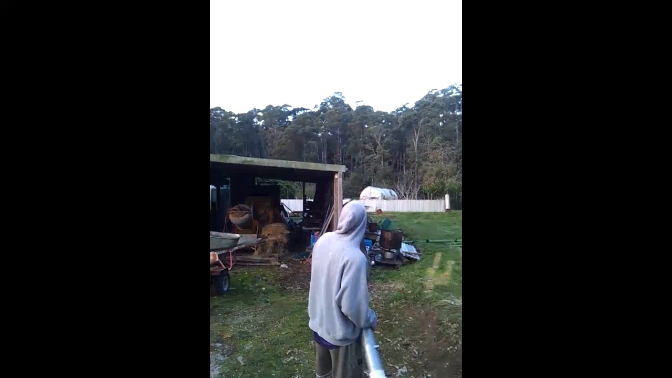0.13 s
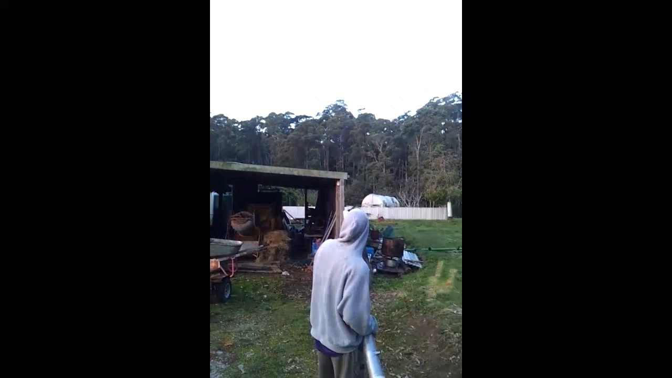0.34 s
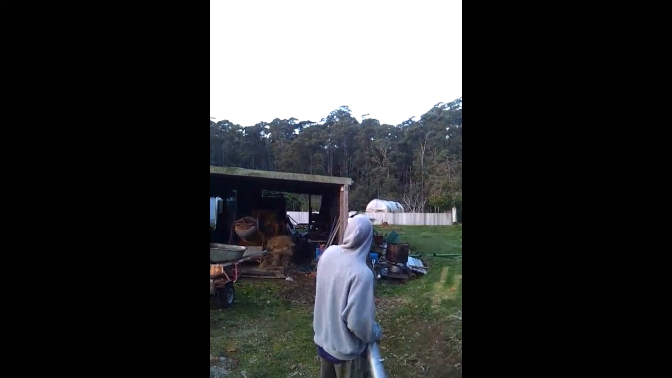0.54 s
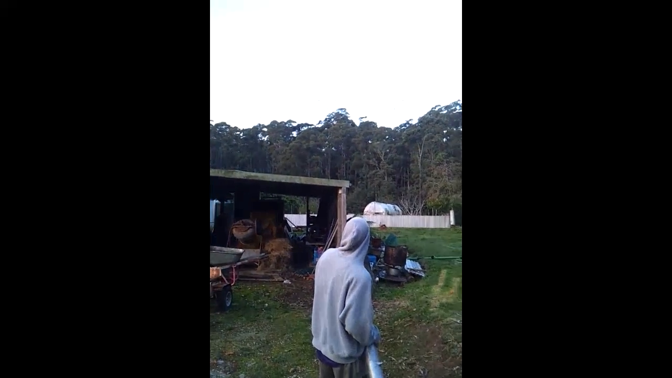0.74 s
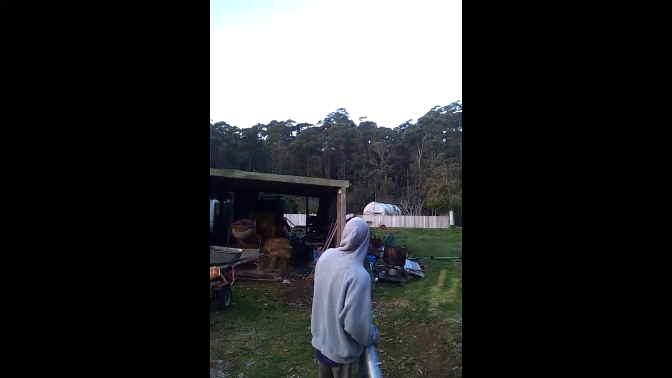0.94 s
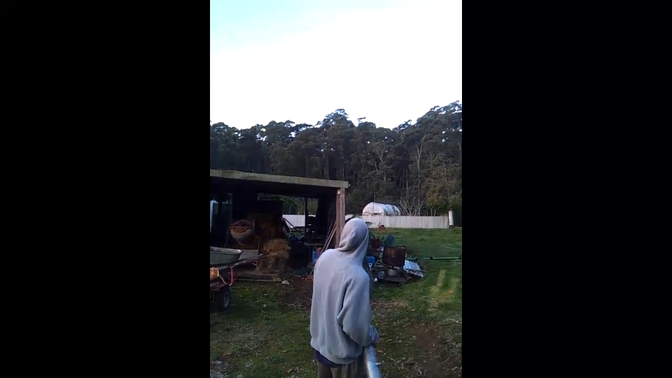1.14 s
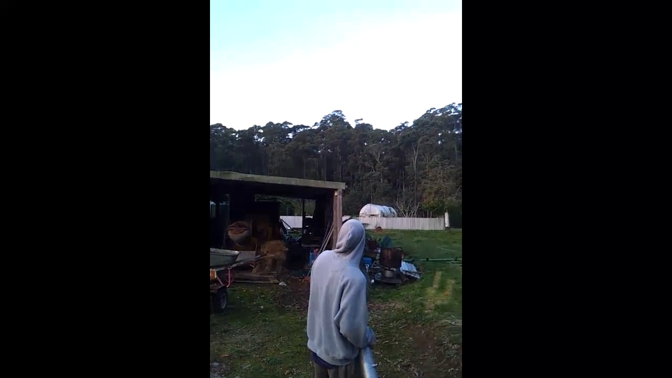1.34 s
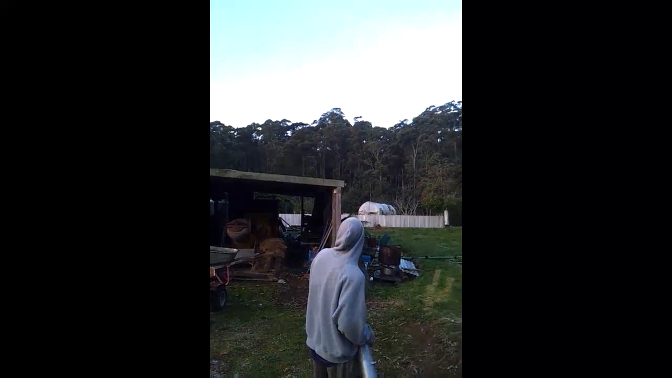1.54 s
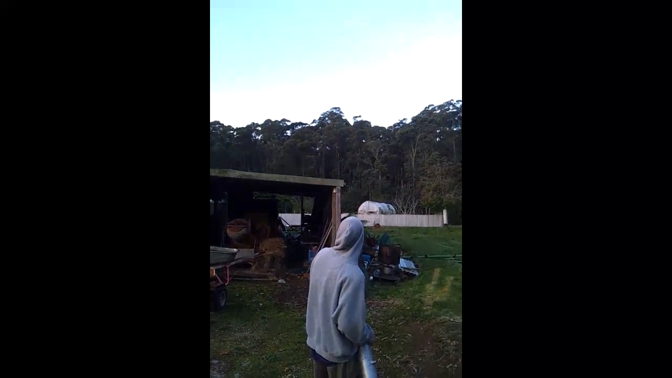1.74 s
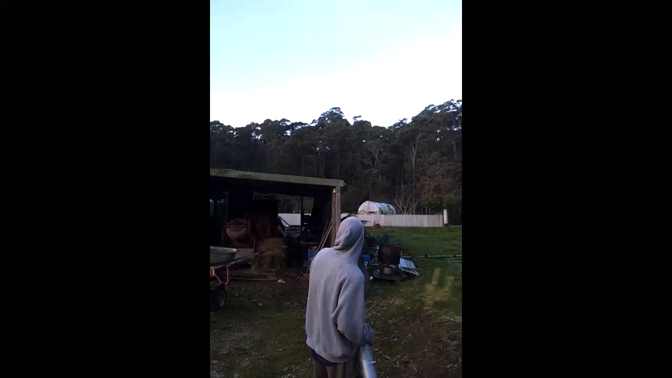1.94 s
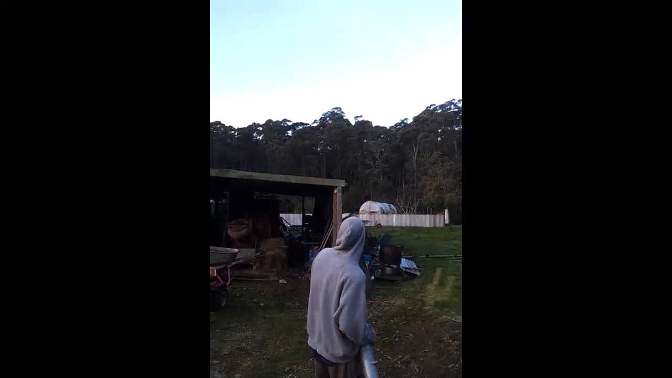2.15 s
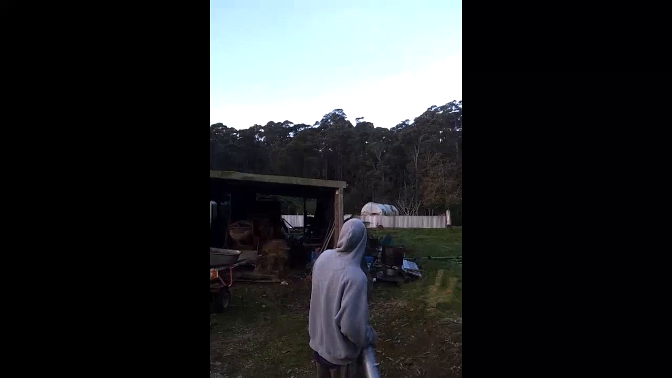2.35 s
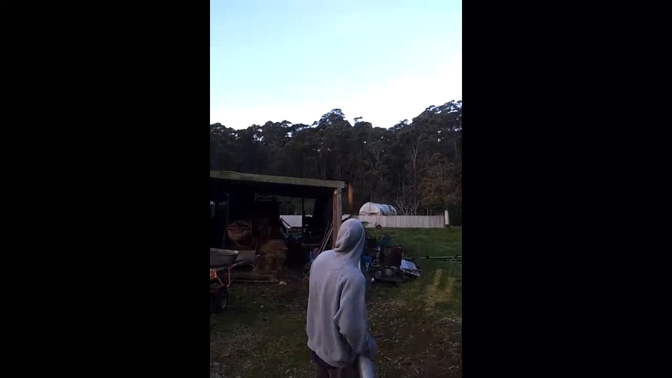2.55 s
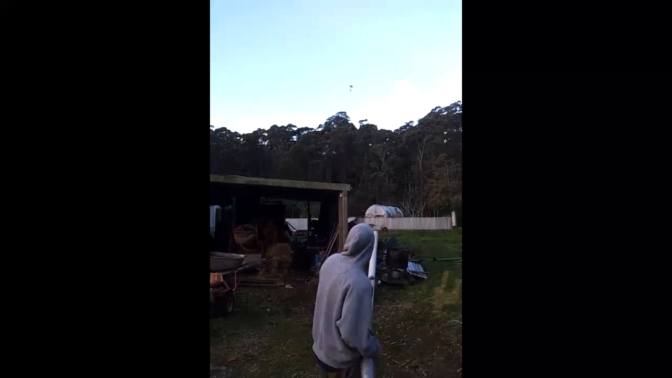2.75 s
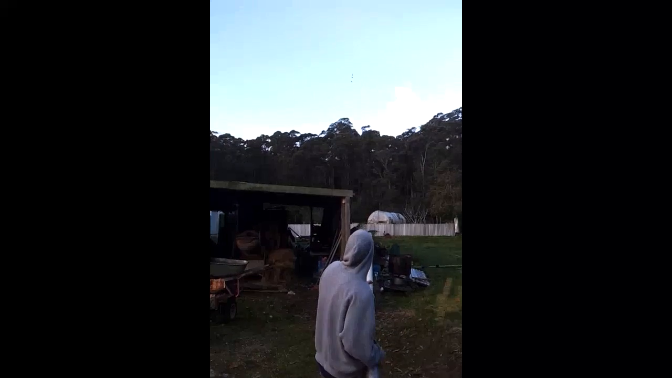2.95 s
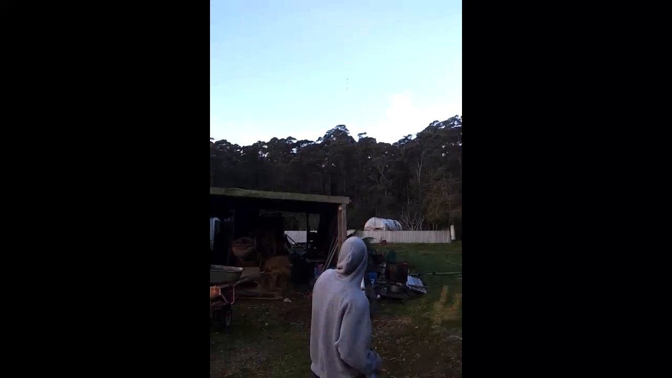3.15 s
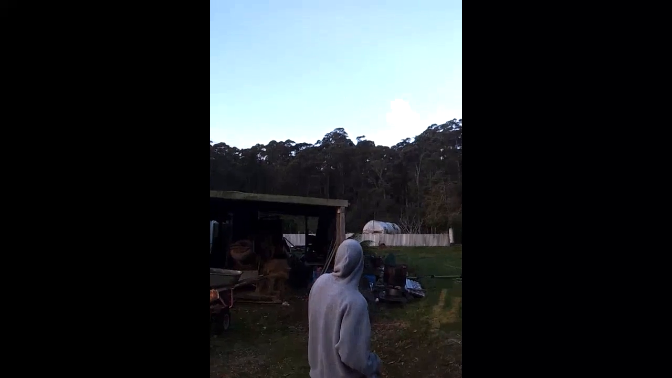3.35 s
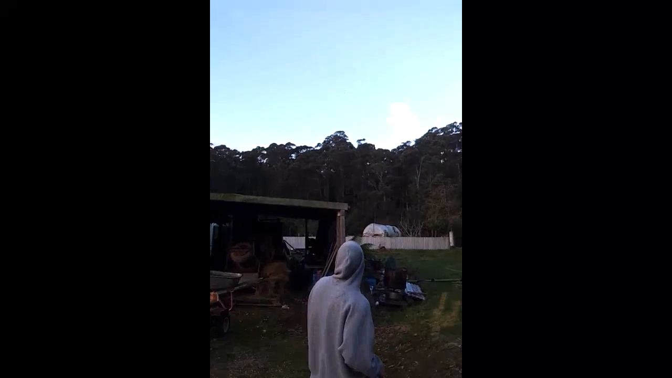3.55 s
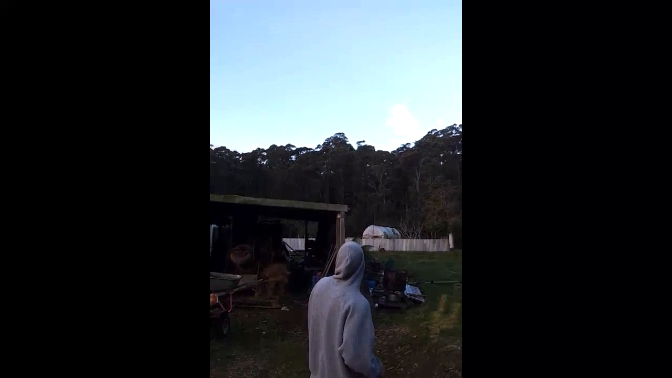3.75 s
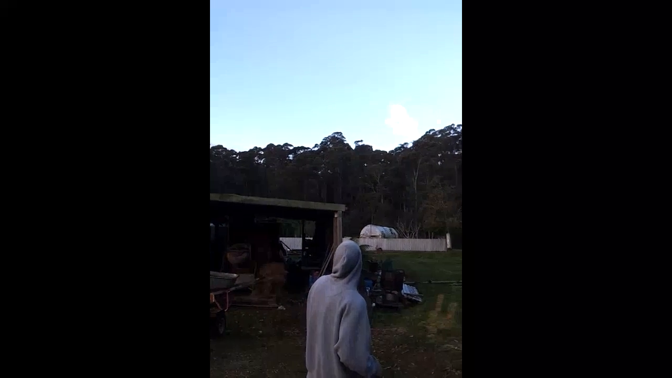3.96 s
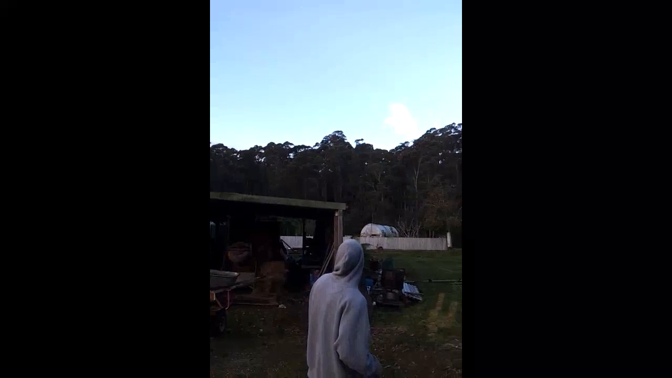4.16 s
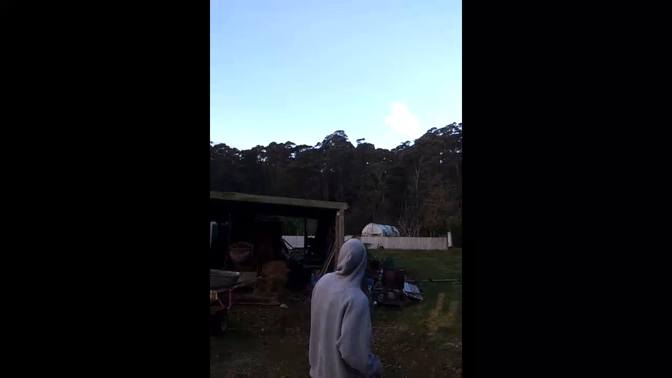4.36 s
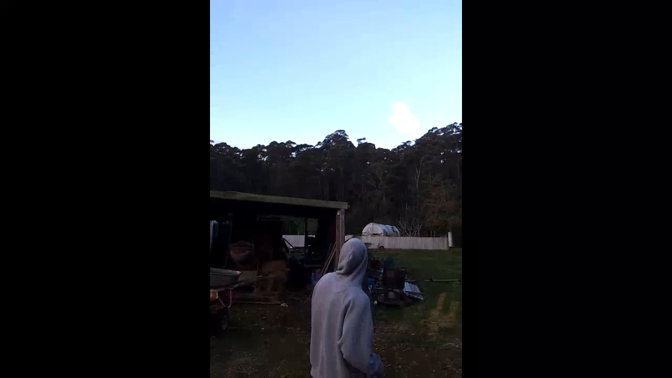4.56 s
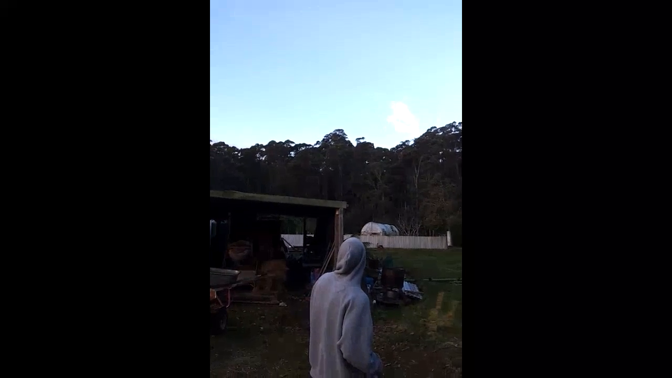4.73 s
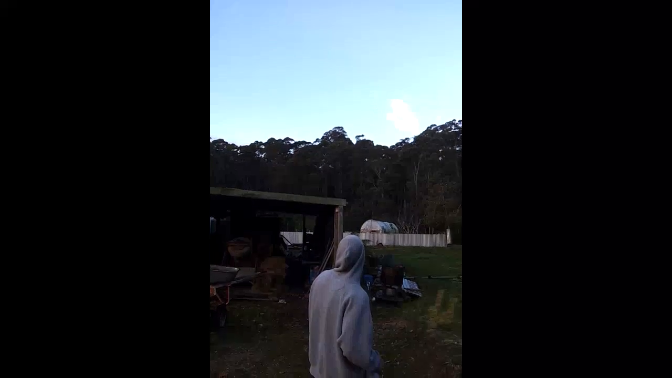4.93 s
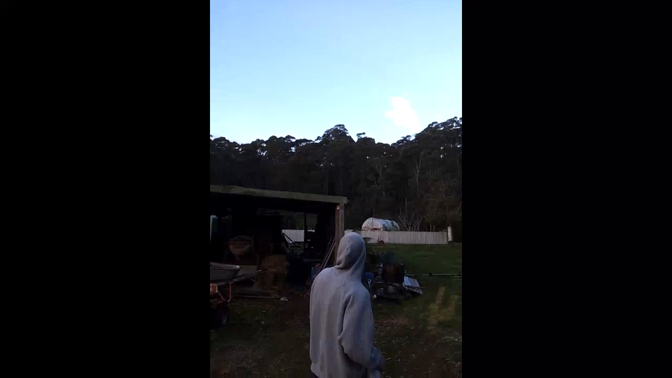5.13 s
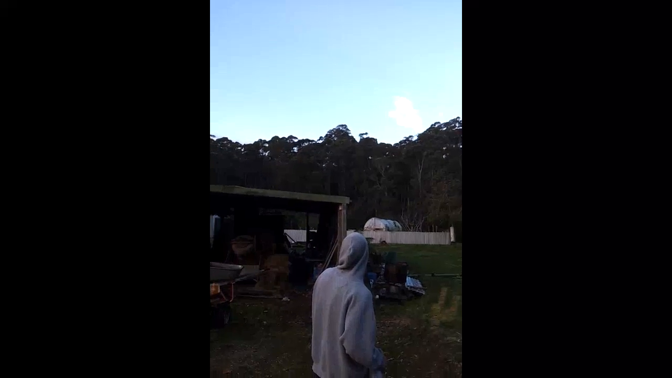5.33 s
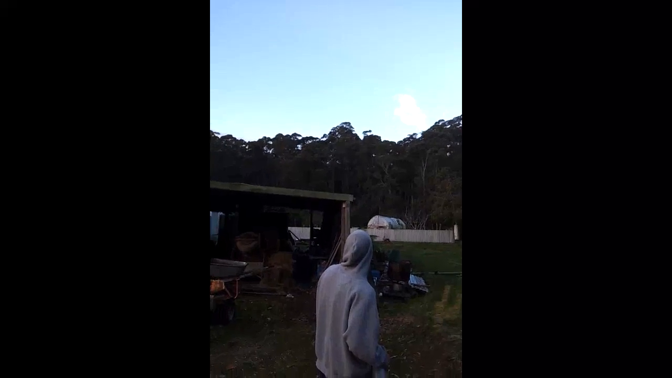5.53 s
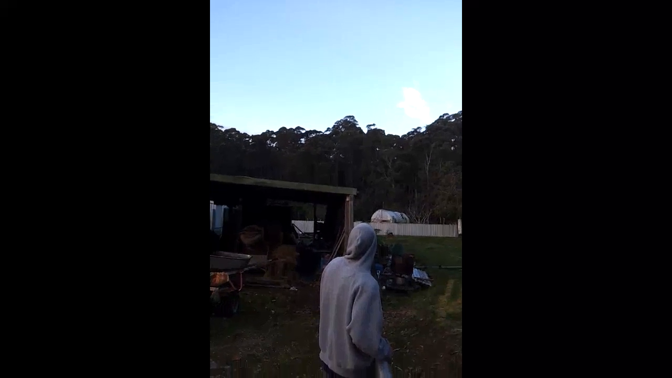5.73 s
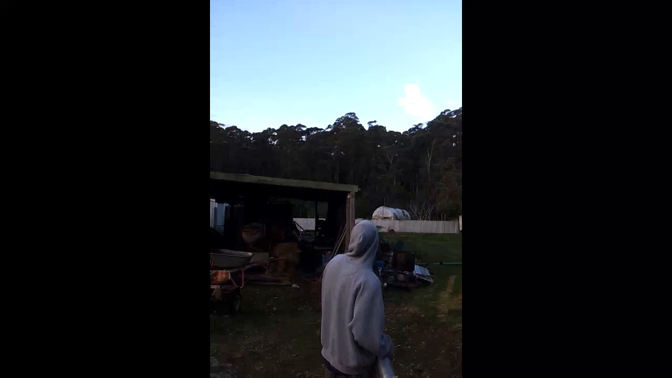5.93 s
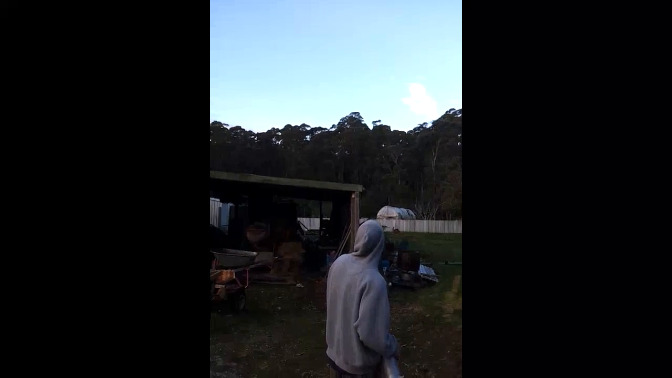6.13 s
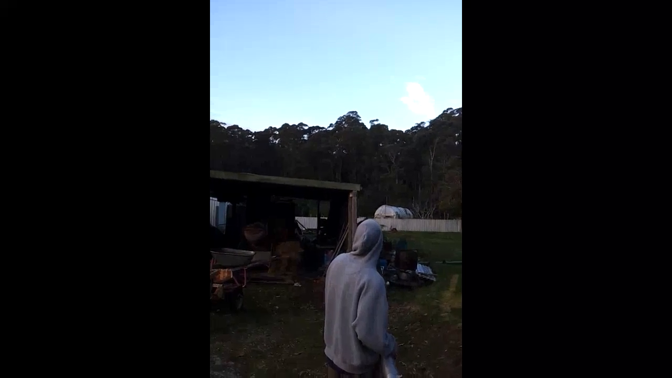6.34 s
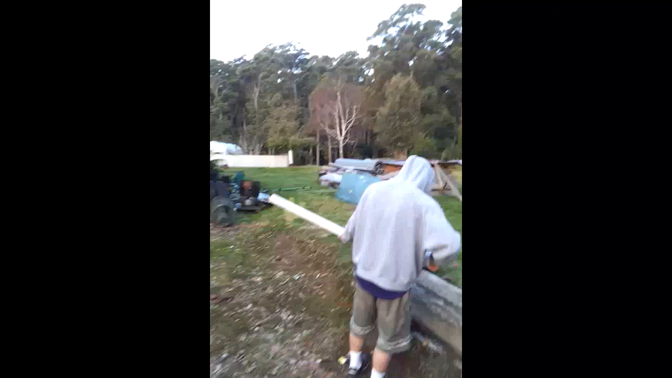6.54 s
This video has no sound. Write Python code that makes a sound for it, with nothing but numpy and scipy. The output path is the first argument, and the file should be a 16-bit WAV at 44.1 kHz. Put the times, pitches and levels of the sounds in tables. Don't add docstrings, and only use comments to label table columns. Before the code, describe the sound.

Outdoors in an open yard with faint wind and hiss, a spring igniter snaps six times about half a second apart, with small button ticks between. The last snap sets off a short rising gas hiss and a massive blast that overloads the close microphone. Echoes slap back from sheds and trees, roll and fade; faint birds follow.

```python
import sys
import numpy as np
from scipy import signal
from scipy.fft import rfft, irfft, next_fast_len
from scipy.io import wavfile

SR = 44100
rng = np.random.default_rng(int(sys.argv[2]) if len(sys.argv) > 2 else 0)


def unload_wav(signal):
    wavfile.write(
        sys.argv[1],
        SR,
        np.round(np.clip(np.atleast_2d(signal).T, -1, 1) * 32767).astype(np.int16),
    )


def ratio(d):
    e = np.asarray(d, float) / 20
    return 10 ** e


N = 290574
T = np.arange(N) / SR

# (frequency [Hz], density [dB per Hz])
AIR_COLOUR = [(12, -43), (20, -9), (146, -3.5), (182, -6), (296, -5), (335, -5.5), (561, -6.5), (915, -9),
              (1320, -10.5), (1530, -12), (7000, -19), (9100, -42), (15400, -120)]
# (time [s], peak [dB], treble share [dB], depth [dB], button pitch [Hz])
PRESSES = [
    (0.184, -27, -9, -8, 1310),
    (0.666, -39.5, -11, -2, 1250),
    (1.125, -32, -18, -4, 1230),
    (1.601, -29.5, -6.5, 3.5, 1510),
    (2.04, -30, -6.5, 4.5, 1670),
    (2.456, -31, -10, -2.5, 1190),
]
CATCH_DB = [-45, -51, -60, -47, -46, -48]
# (treble share [dB], depth [dB], button pitch [Hz])
CATCH_TONE = (-7, 0.96, 1330)
# (time [s], peak [dB])
RELEASES = [(0.594, -32.5), (0.963, -32), (1.463, -32.5), (1.913, -32.5), (2.355, -31.5)]
# (treble share [dB], depth [dB], button pitch [Hz])
RELEASE_TONE = (1, 1.3, 1170)
# (delay [s], level [dB])
TICK_CONTACTS = [
    (.0006, 0),
    (.002, -7),
    (.0068, -11),
    (.011, -19),
]
# (frequency [Hz], width [Hz], level [dB])
TICK_BODY = [(906, 110, -4.5), (1950, 300, -3)]
# (frequency [Hz], width [Hz], level [dB])
TICK_SPRING = [(2880, 430, -3.5), (3500, 2500, 4.5), (4440, 610, -0.5), (5430, 380, -8.5), (6800, 780, -10)]
# (time [s], peak [dB])
SNAPS = [
    (0.2626, -10.5),
    (0.7495, -10),
    (1.2524, -10),
    (1.6874, -10.5),
    (2.1298, -10),
    (2.5402, -11),
]
# (delay [s], body level [dB], treble level [dB])
SNAP_CONTACTS = [
    (-.0033, -10, -30),
    (-.0025, -16, -13),
    (-.0013, 0, 0),
    (0, -8, -9),
    (.0013, -12, -11),
]
# (frequency [Hz], width [Hz], level [dB])
SNAP_BODY = [(805, 190, -6), (1288, 45, -4.5), (1598, 360, -6.5), (2070, 160, -8.5), (2700, 240, -9.5)]
# (frequency [Hz], width [Hz], level [dB])
SNAP_SPRING = [(3300, 1500, -24.5), (4300, 1800, -3.5), (4900, 170, -16.5), (5840, 480, -5.5),
               (6060, 500, -9), (7000, 1100, -2.5), (5060, 48000, 6.5)]
# (delay [s], level [dB], frequency [Hz], width [Hz])
WALLS = [(0.0291, -13, 6800, 2500), (0.035, -21, 6000, 3060), (.043, -16.5, 7000, 2000),
         (.05, -28, 5490, 3000), (0.0944, -30.5, 6470, 3036), (.127, -25, 3500, 2520),
         (.148, -30.5, 5990, 2983)]
# (frequency [Hz], density [dB per Hz])
SHEDS_COLOUR = [(120, -36.5), (200, -8), (601, -7), (698, 3.5), (982, -5.5), (3090, -6.5), (4100, -7),
                (7000, -3.5), (9100, -31), (15400, -120)]
# (frequency [Hz], density [dB per Hz])
LEAK_COLOUR = [(180, -50), (300, -9.5), (451, -29.5), (920, -5), (1300, -18.5), (4780, -8), (5310, -4.5),
               (7000, -9), (9100, -39), (15400, -120)]
# (time [s], frequency [Hz], level [dB], rise [s], decay [s])
LIGHTING = [
    (2.563, 808, -14.5, 0.0024, .006),
    (2.62, 893, -26, 0.008, .025),
]
# (frequency [Hz], density [dB per Hz])
BLAST_COLOUR = [(15, -43.5), (25, -13.5), (113, 1), (351, -1.5), (444, -9.5), (694, -5), (989, -11),
                (1140, -6.5), (1280, -14.5), (1380, -7), (1510, -12.5), (7000, -7.5), (9100, -42),
                (15400, -120)]
# (level [dB], rise [s], hold [s], t60 [s])
BLAST_LAYERS = [
    (-16, 0.0024, 0.094, 0.38),
    (-1.5, 0.0033, 0.056, 0.36),
    (-2, .03, 0.061, .42),
]
YARD_DB = [-52, -46, -42.5]
# (time [s], frequency [Hz], level [dB], rise [s], decay [s])
BOOMS = [
    (2.654, 270, 1.5, 0.0038, 0.021),
    (2.6635, 207, 6.5, 0.0094, 0.021),
    (2.65, 45, -6.5, 0.0061, 0.043),
    (2.65, 69, -9, 0.017, 0.068),
    (2.65, 105, -8.5, .005, 0.032),
    (2.65, 39, -12, 0.0082, .05),
    (2.725, 320, -5, 0.013, .03),
    (2.7, 405, -9.5, 0.0085, 0.03),
    (2.69, 660, -7.5, 0.0069, 0.035),
]
# (round trip [m], build-up [s])
NEAR_BUILDINGS = (127.5, 0.058)
FAR_TREES = (222, 0.068)
# (near level [dB], near t60 [s], far level [dB], far t60 [s])
ROLL_LAYERS = [
    (-42, 1.54, -51, 4.2),
    (-38, 2.3, -40, 3.44),
    (-34, 1.04, -44, 1.7),
]
# (frequency [Hz], density [dB per Hz])
ROLL_COLOUR = [(15, -47), (25, -13), (103, -2), (177, -11), (359, -4.5), (488, -8.5), (662, -5),
               (1410, -1.5), (1550, -14), (1660, -7), (7000, -24.5), (9100, -32.5), (15400, -120)]
# (frequency [Hz], width [Hz], level [dB])
ROLL_PEAKS = [(363, 30, -11), (664, 70, 5.5), (1185, 56, -17.5), (1330, 63, -11), (1615, 200, -28),
              (2000, 98, -62)]
# (time [s], peak [dB], frequency [Hz])
SLAPS = [
    (3.075, -25.5, 643),
    (3.116, -23.5, 600),
    (3.134, -32, 650),
    (3.159, -31, 685),
    (3.207, -38, 689),
]
# (time [s], length [s], frequency [Hz], level [dB])
FAR_BIRDS = [(3.8, .1, 7000, -67), (3.983, 0.16, 6340, -70), (4.05, 0.11, 7230, -65),
             (4.297, 0.15, 5600, -68.5), (4.322, 0.18, 7040, -65.5), (4.599, 0.084, 6230, -70),
             (4.637, 0.15, 7230, -63), (4.828, 0.047, 6130, -65), (4.934, 0.13, 7130, -65.5),
             (6.181, 0.27, 6650, -68)]
# (time [s], frequency [Hz], level [dB])
CHIRP = [
    (5.771, 2205, -67.5),
    (5.778, 2556, -61),
    (5.787, 2454, -57.5),
    (5.795, 2700, -61),
    (5.797, 2280, -51),
    (5.806, 1950, -54.5),
    (5.812, 1750, -66),
    (5.824, 1450, -68),
]

CATCH_S = .041
LEAK_START_S, EXIT_S = 2.5515, 2.649
SOUND_M_PER_S = 343


def coloured(spectrum, low_hz=15, high_hz=20000):
    size = next_fast_len(N, True)
    hz = np.maximum(np.arange(size // 2 + 1) * SR / size, 1)
    points = np.array(spectrum)[:-2]
    gain = ratio(np.interp(np.log(hz), np.log(points[:, 0]), points[:, 1]))
    edges = 1 / np.sqrt((1 + (low_hz / hz) ** 4) * (1 + (hz / high_hz) ** 4))
    noise = irfft(rfft(rng.standard_normal(size)) * gain * edges, size)[:N]
    return noise / np.std(noise)


def resonate(x, peaks, widen=1):
    out = 0
    for k, (hz, width, db) in enumerate(peaks):
        r = np.exp(-np.pi * width * widen / SR)
        poles = [1, -2 * r * np.cos(2 * np.pi * hz / SR), r * r]
        out = out + (-1) ** k * ratio(db) * signal.lfilter([.5, 0, -.5], poles, x + 1e-18)
    return out


def flicker(rate, depth_db):
    r = np.exp(-2 * np.pi * rate / SR)
    slow = signal.lfilter([1], [1, -2 * r, r * r], rng.standard_normal(N))
    return ratio(depth_db * slow / np.std(slow))


def contacts(events, pattern, jitter_s, jitter_db):
    out = np.zeros(N)
    chance = rng.standard_normal((len(events), len(pattern), 2))
    for event, draws in zip(events, chance):
        for (delay, db), (time_draw, level_draw) in zip(pattern, draws):
            at = round((event[0] + delay + jitter_s * time_draw) * SR)
            out[at] += ratio(event[1] + db + jitter_db * level_draw)
    return out


def late(x, delay):
    return np.concatenate([np.zeros(round(delay * SR)), x])[:N]


def tones(rows):
    out = np.zeros(N)
    for s, hz, db, rise, decay in rows:
        t = np.maximum(T - s, 0)
        envelope = (1 - np.exp(-(t / rise) ** 2)) * np.exp(-t / decay)
        out += ratio(db) * envelope * np.sin(2 * np.pi * hz * t)
    return out


def swell(start, rise, hold, t60):
    t = np.maximum(T - start, 0)
    return (1 - np.exp(-(t / rise) ** 2)) * ratio(-60 * np.maximum(t - hold, 0) / t60)


def three_bands(gains, colour, low_hz, high_hz, flicker_db):
    lumps = flicker(45, flicker_db)
    edges = [(15, low_hz), (low_hz, high_hz), (high_hz, 20000)]
    return [gain * lumps * flicker(25, flicker_db) * coloured(colour, *edge) for gain, edge in zip(gains, edges)]


def highpass(x, hz):
    return signal.sosfilt(signal.butter(4, hz, "high", fs=SR, output="sos"), x)


def air():
    settle_db, settle_s = -6, .06
    return ratio(-58 + 1.76 + settle_db * np.exp(-T / settle_s)) * coloured(AIR_COLOUR)


def ticks():
    catches = [(press[0] + CATCH_S, db, *CATCH_TONE) for press, db in zip(PRESSES, CATCH_DB)]
    return list(PRESSES) + catches + [(s, db, *RELEASE_TONE) for s, db in RELEASES]


def button_ticks():
    small = ticks()
    body_events = [(s, db + depth_db) for s, db, _, depth_db, _ in small]
    spring_events = [(s, db + treble_db) for s, db, treble_db, *_ in small]
    out = resonate(contacts(body_events, TICK_CONTACTS, .00005, 0.88), TICK_BODY)
    out += ratio(4.5) * resonate(contacts(spring_events, TICK_CONTACTS, .00005, 0.91), TICK_SPRING)
    for tick in small:
        out += resonate(contacts([tick], TICK_CONTACTS, .00005, 0.73), [(tick[-1], 240, -1)])
    return out


def hammer_snaps():
    body_pattern = [(delay, body_db) for delay, body_db, _ in SNAP_CONTACTS]
    treble_pattern = [(delay, treble_db) for delay, _, treble_db in SNAP_CONTACTS]
    body = ratio(-5) * resonate(contacts(SNAPS, body_pattern, 0, 0.94), SNAP_BODY)
    return body + ratio(1.5) * resonate(contacts(SNAPS, treble_pattern, .00002, 1.0), SNAP_SPRING)


def igniter():
    direct = highpass(button_ticks() + hammer_snaps(), 260)
    walls = np.zeros(N)
    for delay, db, hz, width in WALLS:
        unit_gain = np.pi * width / SR * 2
        walls += late(resonate(direct, [(hz, width, db)]), delay) * unit_gain
    ground = ratio(-4) * late(direct, .0037)
    return direct + ground + walls


def near_echoes():
    hits = np.zeros(N)
    for s, db, *_ in list(SNAPS) + ticks():
        hits[round(s * SR)] = ratio(db)
    t = T[:SR // 2]
    early = ratio(-15.5) * np.exp(-t / 0.0077)
    after = np.maximum(t - .029, 0)
    decay = ratio(-31) * np.exp(-after / 0.045) + ratio(-43.0) * np.exp(-after / 0.27)
    wash = (1 - np.exp(-after / 0.001)) * decay
    clutter = signal.fftconvolve(hits, early)[:N] * coloured(SHEDS_COLOUR, low_hz=450, high_hz=5050)
    sheds = signal.fftconvolve(hits, wash)[:N] * coloured(SHEDS_COLOUR, low_hz=1500)
    return flicker(120, 1.8) * (clutter + sheds)


def recoil():
    knocks = contacts(SNAPS, [(-.003, -33)], 0, 0)
    wall = highpass(resonate(knocks, [(290, 43, 8.9), (418, 41, 10.9)]), 250)
    swing = resonate(knocks, [(16, 5.1, -4.5)])
    return wall + (T > .5) * swing


def leak():
    ceiling_db, gap_db, build_s = -12.5, 50, .027
    muzzle_s, muzzle_db = .012, 6
    building = (T > LEAK_START_S) & (T < EXIT_S + .003)
    level_db = ceiling_db - gap_db * np.exp(-np.maximum(T - LEAK_START_S, 0) / build_s)
    level_db = level_db + muzzle_db * (T > EXIT_S - muzzle_s)
    return building * ratio(level_db) * flicker(150, 1.6) * coloured(LEAK_COLOUR)


def lighting():
    return tones(LIGHTING)


def blast():
    front_db, front_s, yard_t60_s = 9, .01, 1.75
    front = ratio(front_db * np.exp(-np.maximum(T - EXIT_S, 0) / front_s))
    gains = []
    for (db, *shape), yard_db in zip(BLAST_LAYERS, YARD_DB):
        gas = ratio(db) * front * swell(EXIT_S, *shape)
        yard = ratio(yard_db) * swell(EXIT_S, .05, 0.36, yard_t60_s)
        gains.append(np.hypot(gas, yard))
    return sum(three_bands(gains, BLAST_COLOUR, 350, 2500, 1.4)) + tones(BOOMS)


def reflector_return(trees, db, t60):
    round_trip_m, build_s = trees
    return ratio(db) * swell(EXIT_S + round_trip_m / SOUND_M_PER_S, build_s, 0, t60)


def roll():
    gains = []
    for near_db, near_t60, far_db, far_t60 in ROLL_LAYERS:
        near = reflector_return(NEAR_BUILDINGS, near_db, near_t60)
        gains.append(np.hypot(near, reflector_return(FAR_TREES, far_db, far_t60)))
    rumble, roar, hiss = three_bands(gains, ROLL_COLOUR, 300, 2500, 1.0)
    tuned = resonate(roar, ROLL_PEAKS, widen=1.63)
    out = rumble + hiss + 0.57 * roar + 1.05 * tuned * np.std(roar) / np.std(tuned)
    for s, db, hz in SLAPS:
        slap = contacts([(s, db)], [(0, -1.5), (.0015, -2.5), (.004, -10)], 0.00043, 0.91)
        out += resonate(slap, [(hz, 100, 0), (1120, 200, -3), (2200, 2000, 4)])
    return out


def far_birds():
    out = np.zeros(N)
    white = rng.standard_normal(SR // 2)
    t = T[:SR // 2] - .25
    for start, length, hz, db in FAR_BIRDS:
        thin = resonate(resonate(white, [(hz, 350, 0)]), [(hz, 350, 0)])
        note = ratio(db) * np.exp(-(t / length * 2) ** 2) * thin / np.std(thin)
        at = round((start - .25) * SR)
        out[at:at + SR // 2] += note[:N - at]
        white = np.roll(white, 3001)
    return out


def near_chirp():
    s, hz, db = np.transpose(CHIRP)
    gain = ratio(np.interp(T, s, db + 3, left=-140, right=-140))
    phase = 2 * np.pi * np.cumsum(np.interp(T, s, hz)) / SR
    return gain * flicker(150, 2.5) * np.sin(phase)


def scene():
    igniter_sound = igniter() + near_echoes() + recoil()
    shot = leak() + lighting() + blast() + roll()
    return (air() + igniter_sound + shot + far_birds() + near_chirp())[None]


def top_cut(x):
    return signal.sosfilt(signal.butter(12, 15750, fs=SR, output="sos"), x)


def record(dry):
    lifted = dry + resonate(dry, [(6500, 3100, -20)])
    held = lifted / (1 + np.abs(lifted / 0.61) ** 6) ** (1 / 6)
    narrow = signal.sosfilt(signal.cheby2(8, 40, 8150, fs=SR, output="sos"), held)
    narrow = narrow + ratio(-28) * held
    narrow = signal.sosfilt(signal.ellip(8, .5, 70, 8900, fs=SR, output="sos"), narrow)
    return top_cut(np.clip(narrow, -.74, .74))


dry = scene()
out = record(dry)
unload_wav(out)
```